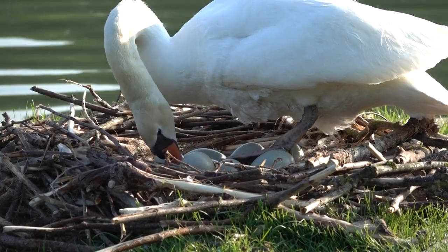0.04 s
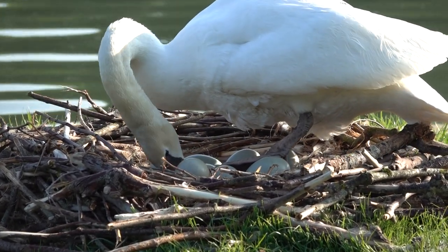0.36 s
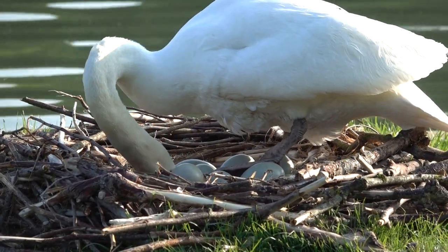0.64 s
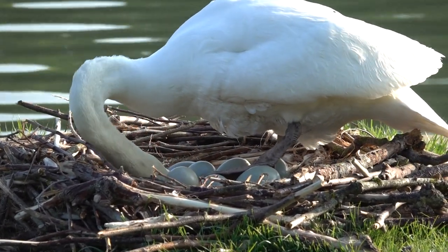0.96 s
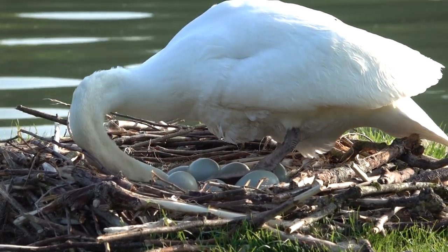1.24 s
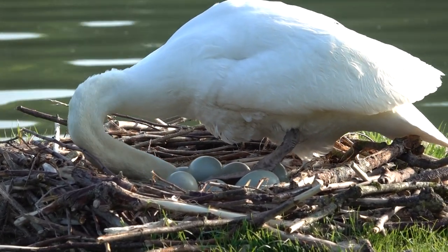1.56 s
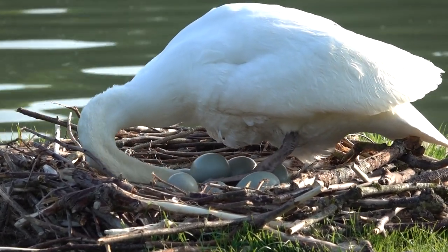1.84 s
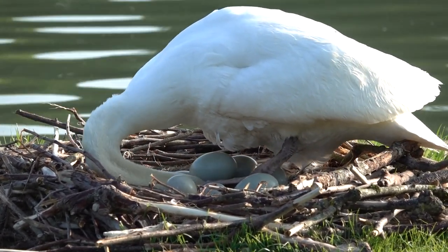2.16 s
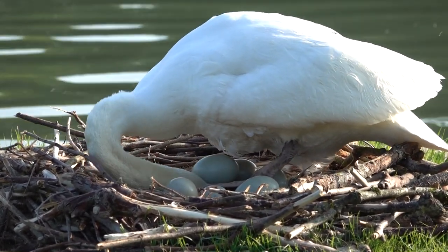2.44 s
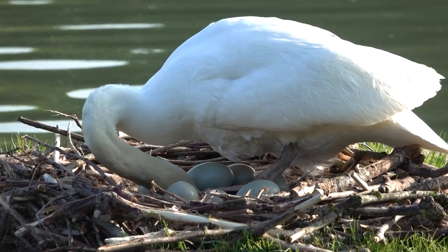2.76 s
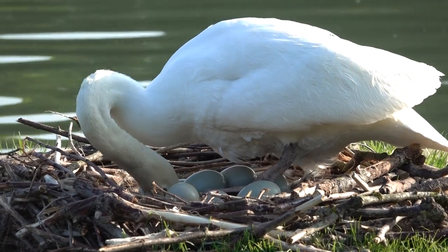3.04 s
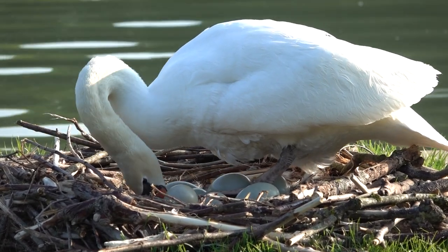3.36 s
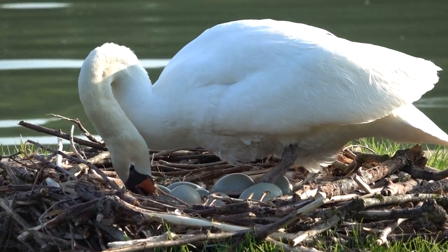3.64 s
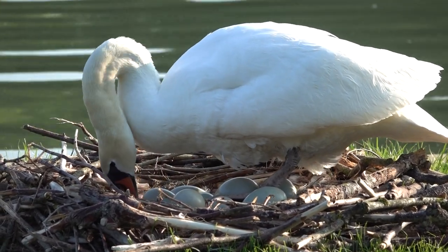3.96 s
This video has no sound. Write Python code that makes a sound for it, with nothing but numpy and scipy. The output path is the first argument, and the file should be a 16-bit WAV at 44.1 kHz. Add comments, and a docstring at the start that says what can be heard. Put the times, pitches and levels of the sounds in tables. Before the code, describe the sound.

A songbird on the right sings short whistles and sliding chirps throughout, busiest around 1 second and loudest near 2.3. Faint birds twitter farther off. A low outdoor rumble and distant drone swell around 1.7 seconds, while soft wind bumps the microphone near 0.8, 2 and 3. Dry nest twigs rustle faintly and snap at about 0.9, 2.4, 3.3 and 3.7 seconds.

```python
"""A lake shore, by a swan's nest. A low rumble and a distant drone swell and ebb under a soft rush
of wind, which now and then buffets the microphone. Far birds twitter and others sing runs of quick
sweeps, each note a wavering tone echoed by the trees. The nest's dry stems rustle and its twigs snap.
A small bird peeps ahead; the main voice, a songbird to the right, whistles and slurs."""
import sys
import numpy as np
from scipy import signal
from scipy.fft import rfft, irfft, next_fast_len
from scipy.io import wavfile
from scipy.ndimage import uniform_filter1d, map_coordinates

SR = 44100
rng = np.random.default_rng(int(sys.argv[2]) if len(sys.argv) > 2 else 0)


def waveform_to_disk(signal):
    """Save audio, clipped to [-1, 1], as 16-bit WAV at the path in sys.argv[1]."""
    frames = np.transpose(np.atleast_2d(signal))
    scaled = np.clip(frames, -1, 1) * 32767
    samples = np.round(scaled).astype(np.int16)
    wavfile.write(sys.argv[1], SR, samples)


N = 176400

# swell and ebb of the background and the nest (time [s], level [dB]); rumble and drone get a trim
RUMBLE_LEVEL = [(0, -42), (.7, -40.5), (1.15, -40), (1.65, -38), (2.1, -43.5), (2.55, -40), (3.1, -42),
                (4, -43.5)]
DRONE_LEVEL = [(0, -49.5), (.7, -49.5), (1.3, -45), (1.78, -40.5), (2.0, -44.5), (3.4, -49), (3.8, -43.5),
               (4, -47)]
CHORUS_LEVEL = [(0, -59.5), (.8, -60), (1.1, -61.5), (1.35, -64), (2.0, -68.5), (2.4, -62), (2.9, -65),
                (3.1, -66.5), (3.5, -64.5), (4, -69.5)]
RUSTLE_LEVEL = [(0, -93), (1.2, -72), (1.7, -70), (2.35, -74), (2.6, -80), (4, -89)]
# tone colour of each layer (frequency [Hz], relative density [dB])
RUMBLE_SPECTRUM = [(15, -21), (30, -17), (48, -1.5), (100, -1.5), (130, -7.5), (170, -8.5), (260, -22),
                   (500, -70)]
DRONE_SPECTRUM = [(110, -28), (165, -3.5), (210, 9.5), (262, -1), (305, 6.5), (328, 2.5), (362, -13.5),
                  (412, 2.5), (455, -25.5), (515, -3), (600, -53.5)]
HUM_SPECTRUM = [(275, -20), (300, -2), (332, -1.5), (360, -42), (500, -76)]
RUSH_SPECTRUM = [(80, -1.5), (300, 0), (550, -1), (950, -1.5), (1250, -9), (1600, -15), (2000, -25.5),
                 (3000, -33), (6000, -37), (15000, -66)]
HISS_SPECTRUM = [(1000, -27), (4000, -30), (6300, 11), (8000, 12.5), (11000, 10), (15500, 8)]
CHORUS_SPECTRUM = [(1700, -36), (2300, -8.5), (2800, 2.5), (3800, 0.5), (4400, -4.5), (5200, -7.5),
                   (6000, -14.5), (8000, -26.5), (10000, -35)]
RUSTLE_SPECTRUM = [(1000, -9), (2200, 11.5), (6500, -3), (9000, -20), (13500, -9)]
# width of the wind at the microphone (frequency [Hz], left-right likeness [clipped to -1..1])
RUSH_LIKENESS = [(200, 1.5), (500, 1.06), (1000, 0.85), (2000, 0.15), (8000, -1.5)]
# lean of the wind (frequency [Hz], pan [dB]); every pan is left minus right
RUSH_PAN = [(200, 0), (500, 0.5), (1000, 6), (2000, 6.5), (5000, -3)]
# wind on the microphone (time [s], Gaussian half length [s], centre [Hz], level [dB])
BUFFETS = [(0.693, 0.051, 56, -37.5), (0.815, 0.089, 110, -37), (1.9, 0.11, 65.4, -33),
           (2.216, 0.031, 75, -31), (2.76, 0.034, 127, -35), (2.964, 0.12, 75, -35),
           (3.25, 0.05, 50.5, -38)]
# echo among the trees (frequency [Hz], time to fall 60 dB [s])
TREE_DECAY = [(3500, .95), (8000, .6)]
# twigs breaking in the nest (time [s], peak before panning [dB], resonance [Hz])
SNAPS = [(.913, -42, 2170), (1.173, -47, 3540), (2.322, -43, 2220), (2.403, -39, 2000), (2.64, -52, 12000),
         (3.314, -37, 2000), (3.392, -46.5, 12000), (3.691, -41, 2380)]
# runs of sweeps (time [s], period [s], sweep length [s], start [Hz], end [Hz],
# level at the bird [dB], echo gain [dB], pan [dB])
RUNS = [(.03, .085, .035, 8500, 7400, -85, 8, -3), (.243, .045, .018, 3200, 3850, -58, -3, -10),
        (1.18, .128, .05, 6600, 3800, -76, -6, 9), (2.98, .07, .03, 5000, 3900, -73, 6, -6)]
# the small bird's peeps and the songbird's slurs (time [s], length [s], start [Hz], middle [Hz],
# end [Hz], level at the bird [dB], roughness [0-1])
PEEPS = [(.145, 0.04, 8350, 7650, 7300, -70.5, .3), (2.217, 0.05, 6500, 6630, 5920, -69, 0.2),
         (3.222, .125, 6270, 6740, 6580, -76.5, 0.09)]
SLURS = [(0.103, 0.022, 3730, 3510, 3360, -51, 0.1), (0.115, 0.051, 2900, 2480, 2310, -57.5, 0.67),
         (0.19, 0.035, 2400, 2500, 2820, -59, 1), (0.476, 0.045, 5200, 4340, 3800, -53.5, 0.3),
         (.519, 0.057, 4450, 3596, 3225, -47, 0.34), (0.742, 0.041, 3890, 3590, 3180, -53, 0.7),
         (0.782, 0.093, 3020, 2457, 2310, -56, 0.83), (0.821, 0.04, 4490, 3850, 3980, -47, 0.23),
         (0.862, 0.0197, 4000, 3520, 2960, -51.5, 0.2), (0.95, 0.066, 3960, 3740, 3350, -49, 0.22),
         (1.04, 0.07, 4400, 4730, 4820, -64, 0.34), (1.857, 0.044, 4250, 3880, 4120, -60.5, 0.1),
         (2.091, 0.065, 4100, 3530, 3450, -52.5, 0.85), (2.143, 0.04, 3425, 3020, 2800, -60, 0.16),
         (2.442, 0.056, 3350, 3150, 2830, -51.5, 0.44), (2.768, 0.043, 3900, 3980, 4350, -60.5, .2),
         (2.797, 0.024, 4400, 3510, 3100, -61, 0.1), (2.825, .055, 2760, 2500, 2430, -62.5, 0.48),
         (3.072, 0.033, 4280, 3650, 3220, -56.5, 0.32), (3.328, 0.048, 4450, 3150, 2880, -63, 0.2)]
# the songbird's whistles; the row at 1.905 s is a fainter echo of the whistle before it (time [s], length [s],
# onset [Hz], held [Hz], level at the bird [dB])
WHISTLES = [(0.162, 0.043, 3910, 4070, -60), (0.96, 0.052, 3980, 4100, -55),
            (1.06, 0.041, 4210, 4000, -53.5), (1.148, 0.067, 3630, 3890, -52),
            (1.015, 0.082, 4620, 5150, -61.5), (1.37, 0.083, 2204, 2570, -59),
            (1.493, 0.077, 3770, 3390, -54), (1.702, 0.115, 2844, 3290, -53.5),
            (1.905, 0.069, 3236, 3265, -57), (2.145, 0.075, 3484, 3290, -51),
            (2.279, 0.11, 3810, 3800, -44), (2.531, 0.053, 4040, 3460, -53), (2.69, 0.059, 2780, 2800, -55),
            (3.76, 0.056, 3810, 3870, -60.5)]

SONG_PAN_DB, SONG_ECHO_DB = -18, -6.5


def amp(db):
    """Decibels to gain."""
    return 10 ** (np.asarray(db) / 20)


def unit(x):
    """Scale to rms 1."""
    return x / np.sqrt(np.mean(x ** 2) + 1e-20)


def along(points, hz):
    """Read (frequency [Hz], value) points on a log axis."""
    f, v = np.transpose(points)
    return np.interp(np.log(hz + 1), np.log(f + 1), v)


def curve(rows):
    """Spread (time [s], value) points over every sample."""
    return np.interp(np.arange(N) / SR, *np.transpose(rows))


def filtered(x, response):
    """Filter x by a gain that depends on frequency."""
    m = next_fast_len(N + SR // 4)
    return irfft(rfft(x, m) * response(np.fft.rfftfreq(m, 1 / SR)), m)[..., :N]


def band(hz, centre, width):
    """Gain of a flat-topped band, its width in log frequency."""
    return 1 / (1 + (np.log((hz + 1) / centre) / width) ** 4)


def sides(pan_db):
    """Left and right gains of constant power."""
    gains = amp(np.array([np.atleast_1d(pan_db), -np.atleast_1d(pan_db)]) / 2)
    return gains / np.sqrt(np.mean(gains ** 2, axis=0))


def add(out, s, x):
    """Mix x in at time s."""
    i = max(0, round(s * SR))
    out[:, i:i + x.shape[-1]] += x[:, :max(0, N - i)]


def noise(spectrum, likeness, patchy_db):
    """Stereo noise of rms 1, its gain patchy in time and frequency."""
    cells = signal.stft(rng.standard_normal((2, N)), nperseg=512)[2]
    patches = uniform_filter1d(rng.standard_normal(cells.shape[1:]), size=4, axis=0)
    patches = uniform_filter1d(patches, size=10, axis=1)
    pair = signal.istft(cells * amp(patchy_db * unit(patches)), nperseg=512)[1][:, :N]

    def mid_side_gains(hz):
        angle = np.arccos(np.clip(along(likeness, hz), -1, 1)) / 2
        return amp(along(spectrum, hz)) * [np.cos(angle), np.sin(angle)]
    mid, side = filtered(pair, mid_side_gains)
    return unit(np.array([mid + side, mid - side]))


def rumble(trim_db=1):
    """The low outdoor rumble swells and ebbs."""
    return amp(curve(RUMBLE_LEVEL) + trim_db) * noise(RUMBLE_SPECTRUM, [(70, .95)], patchy_db=.5)


def drone(trim_db=-1.5):
    """A distant drone: noise with several low peaks, nearly mono."""
    likeness = [(150, 1), (280, .97)]
    return amp(curve(DRONE_LEVEL) + trim_db) * noise(DRONE_SPECTRUM, likeness, patchy_db=1.75)


def hum(peak_s=1.53, half_s=.27, db=-49.5):
    """A faint, narrow hum rises within the drone and fades."""
    swell = np.exp(-((np.arange(N) / SR - peak_s) / half_s) ** 2 / 2)
    narrow = filtered(rng.standard_normal(N), lambda hz: amp(along(HUM_SPECTRUM, hz)))
    return amp(db) * swell * unit(narrow)


def wind(rush_db=-49, hiss_db=-76.5):
    """Air moves along the shore: an even rush and a faint hiss."""
    rush = noise(RUSH_SPECTRUM, RUSH_LIKENESS, patchy_db=.97)
    rush = filtered(rush, lambda hz: sides(along(RUSH_PAN, hz)))
    hiss = noise(HISS_SPECTRUM, [(8000, .42)], patchy_db=.6)
    return amp(rush_db) * rush + amp(hiss_db) * hiss


def buffets(side_db=-14):
    """Wind pushes at the microphone in brief swells of narrow, low noise."""
    out, t = np.zeros((2, N)), np.arange(N) / SR
    for s, half, centre, db in BUFFETS:
        swell = np.exp(-((t - s) / half) ** 2 / 2)
        gust = swell * filtered(rng.standard_normal((2, N)), lambda hz: band(hz, centre, width=.34))
        mid, side = gust * np.sqrt(np.sum(swell ** 2) / np.sum(gust ** 2, axis=1, keepdims=True))
        out += amp(db) * (mid + amp(side_db) * np.array([side, -side]))
    return out


def trees(x):
    """The trees scatter a diffuse echo, new for each sound; its treble dies first."""
    hz, t, cells = signal.stft(rng.standard_normal((2, SR * 3 // 4)), SR, nperseg=256)
    decay = amp(-60 * t / along(TREE_DECAY, hz)[:, None])
    tail = signal.istft(cells * decay, SR, nperseg=256)[1]
    return signal.fftconvolve(x, tail / np.linalg.norm(tail[0]), axes=1)


def note(hz, rough, waver=1, rough_hz=420, waver_hz=75, attack_s=.014, release_s=.012):
    """A bird's tone on a pitch path; roughness shakes pitch and level fast, waver more slowly."""
    t = np.arange(len(hz)) / SR
    shake, flutter, drift, swell = [map_coordinates(rng.standard_normal(128), [t * rate], mode="wrap")
                                    for rate in (rough_hz, rough_hz, waver_hz, waver_hz)]
    attack = np.sin(np.pi / 2 * np.clip(t / attack_s, 0, 1))
    release = np.sin(np.pi / 2 * np.clip((t[-1] - t) / release_s, 0, 1))
    pitch = hz * (1 + .0594 * rough * shake + .009 * waver * drift)
    level_db = 6.5 * rough * flutter + 2 * waver * swell
    return unit(attack * release * amp(level_db) * np.sin(2 * np.pi * np.cumsum(pitch) / SR))


def add_bird(out, s, tone, pan_db, echo_db, direct_db=-4):
    """A note reaches the microphone directly and as a wider echo, nearer the centre."""
    add(out, s, amp(direct_db) * tone * sides(pan_db))
    add(out, s, amp(echo_db) * trees(tone * sides(.58 * pan_db)))


def chorus(count=70, direct_db=-9, twitter_db=-1, pan_db=-7):
    """Far off, random chirps ring on in the trees over a soft blur of farther song."""
    chirps = np.zeros((2, N))
    for k, (when, pitch, glide) in enumerate(rng.random((count, 3))):
        hz = (2500 + 2900 * pitch) * np.linspace(1, .78 + .3 * glide, int(.05 * SR))
        add(chirps, (k + when) / count * N / SR, note(hz, rough=.2) * sides(0))
    echoing = trees(chirps)[:, :N] + amp(direct_db) * chirps
    twitter = unit(filtered(echoing, lambda hz: amp(along(CHORUS_SPECTRUM, hz))))
    blur = noise(CHORUS_SPECTRUM, [(3000, .3)], patchy_db=2.5)
    return amp(curve(CHORUS_LEVEL)) * sides(pan_db) * unit(blur + amp(twitter_db) * twitter)


def sweeps(repeats=6):
    """Birds on either side each repeat one quick sweep; the farthest are mostly echo."""
    out = np.zeros((2, N))
    for s, period, length, start, end, db, echo_db, pan_db in RUNS:
        hz = np.linspace(start, end, int(length * SR))
        for k in range(repeats):
            add_bird(out, s + k * period, amp(db) * note(hz, rough=.029), pan_db, echo_db)
    return out


def rustle(count=3000, range_db=22, spread_db=8):
    """Dry stems of the nest rub and tick under the swan in many tiny grains."""
    when, softness, place = rng.random((3, count))
    gains = sides(spread_db * (2 * place - 1)) * amp(-range_db * softness)
    ticks = np.array([np.bincount((when * N).astype(int), channel, N) for channel in gains])
    stems = filtered(ticks, lambda hz: amp(along(RUSTLE_SPECTRUM, hz)))
    return amp(curve(RUSTLE_LEVEL)) * unit(stems)


def twigs(splinter_db=-18.5, t60_s=.025):
    """Each snap is a sharp pulse and a short splintering tail in a dry stick's broad resonance."""
    out, t = np.zeros((2, N)), np.arange(SR // 20) / SR
    hz = np.fft.rfftfreq(len(t), 1 / SR)
    for s, db, pitch in SNAPS:
        force = (t == 0) + amp(splinter_db - 60 * t / t60_s) * rng.standard_normal((2, len(t)))
        crack = np.fft.fftshift(irfft(rfft(force) * band(hz, pitch, width=.36)), axes=1)
        add(out, s - t[-1] / 2, amp(db) * crack / np.abs(crack).max() * sides(pan_db=1.5))
    return out


def bent_notes(notes, pan_db):
    """A bird bends each note smoothly through three pitches."""
    out = np.zeros((2, N))
    for s, length, start, middle, end, db, rough in notes:
        parabola = np.polyfit([0, .5, 1], [start, middle, end], 2)
        hz = np.polyval(parabola, np.linspace(0, 1, int(length * SR)))
        add_bird(out, s, amp(db) * note(hz, rough), pan_db, SONG_ECHO_DB)
    return out


def small_bird():
    """Thin, high peeps straight ahead of the microphone."""
    return bent_notes(PEEPS, pan_db=0)


def songbird(settle_s=.00987, loud_db=-49):
    """To the right, slurs and whistles that glide onto a pitch; the loudest is steadier and drier."""
    whistles = np.zeros((2, N))
    for s, length, onset, held, db in WHISTLES:
        t = np.arange(int(length * SR)) / SR
        hz = held + (onset - held) * np.exp(-t / settle_s)
        echo_db, waver = (-14, .3) if db > loud_db else (SONG_ECHO_DB, 1)
        add_bird(whistles, s, amp(db) * note(hz, rough=.08, waver=waver), SONG_PAN_DB, echo_db)
    return whistles + bent_notes(SLURS, SONG_PAN_DB)


def scene():
    """Air, birds and nest as heard from the shore."""
    air = rumble() + drone() + wind() + buffets()
    birds = songbird() + small_bird() + sweeps() + chorus()
    nest = twigs() + rustle()
    return air + hum() + birds + nest


def record(dry, top_hz=15700):
    """The recorder keeps nothing above its band limit."""
    return filtered(dry, lambda hz: hz < top_hz)


dry = scene()
out = record(dry)
waveform_to_disk(out)
```